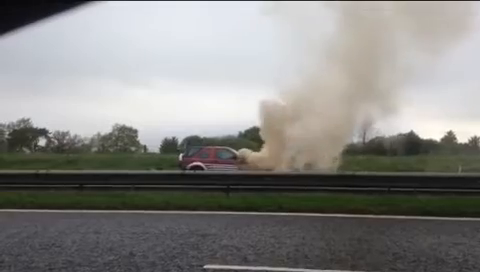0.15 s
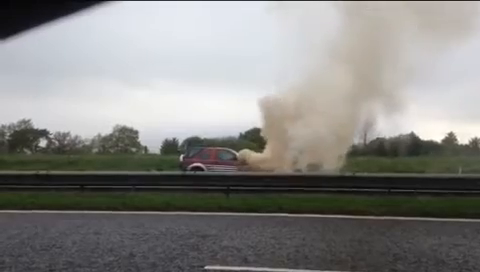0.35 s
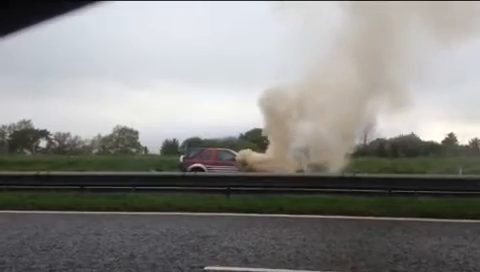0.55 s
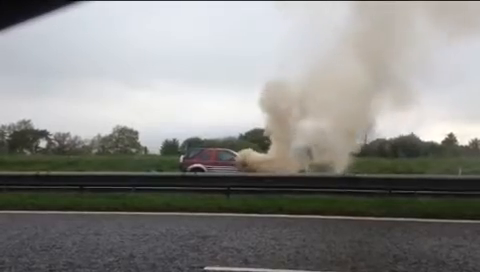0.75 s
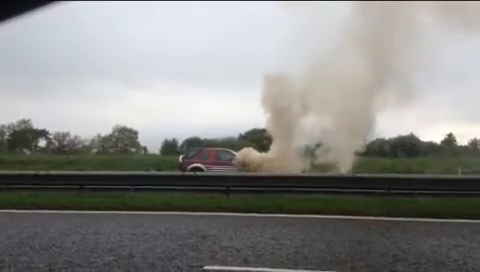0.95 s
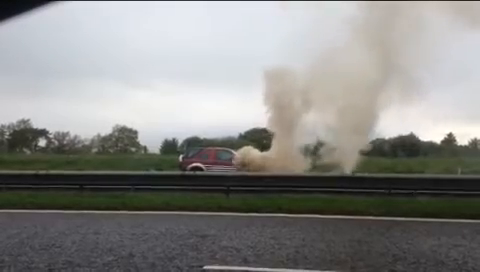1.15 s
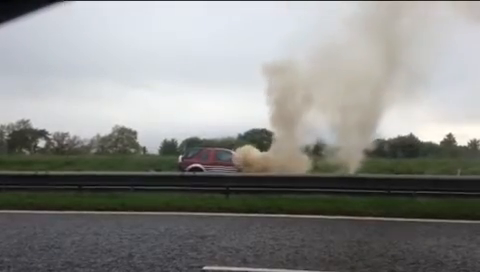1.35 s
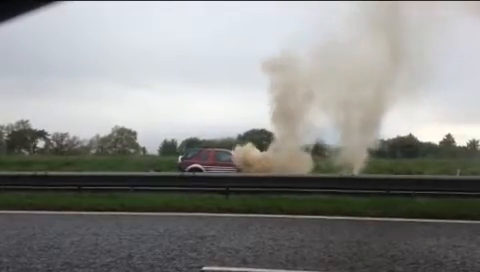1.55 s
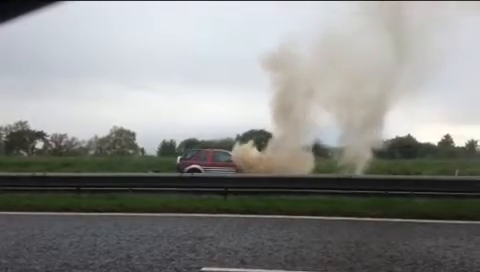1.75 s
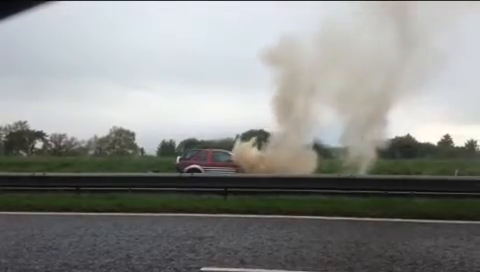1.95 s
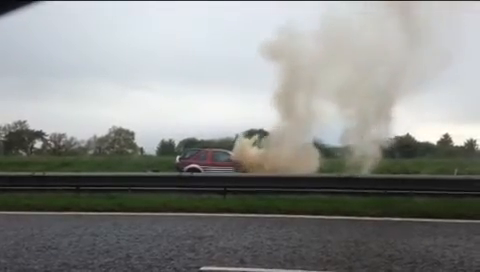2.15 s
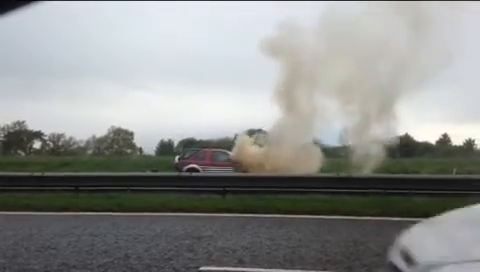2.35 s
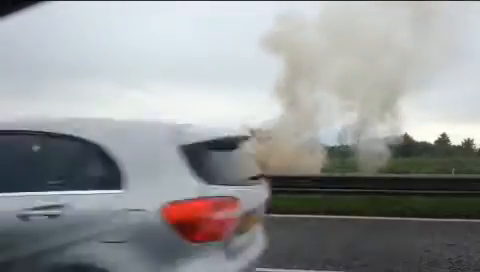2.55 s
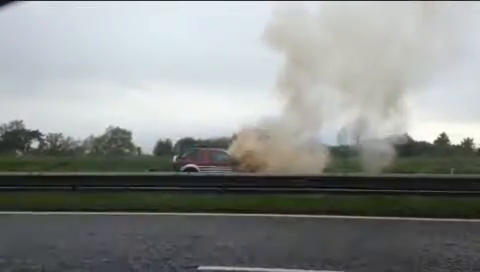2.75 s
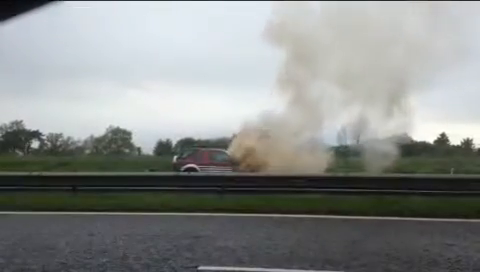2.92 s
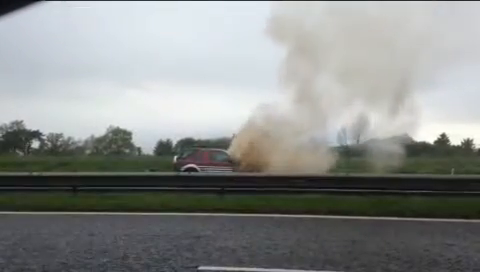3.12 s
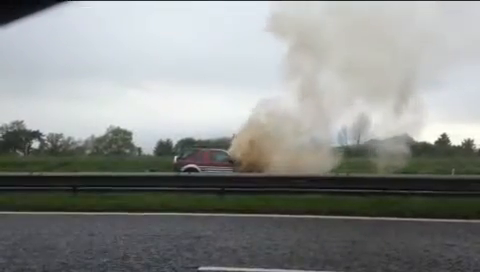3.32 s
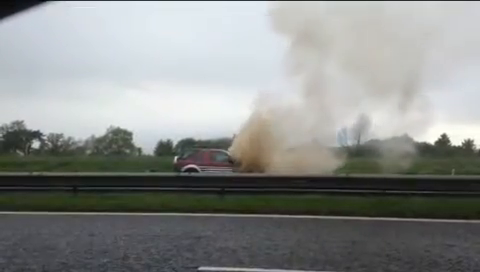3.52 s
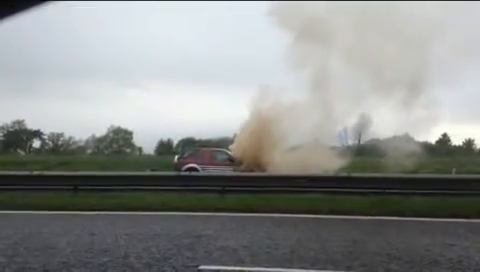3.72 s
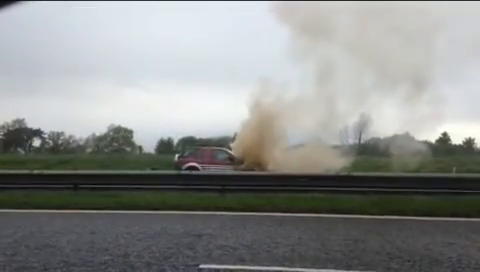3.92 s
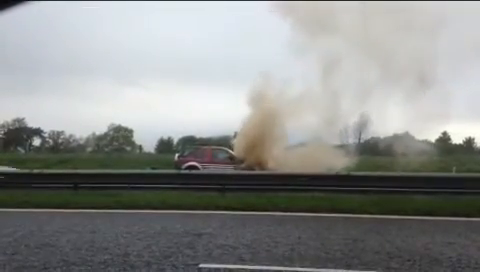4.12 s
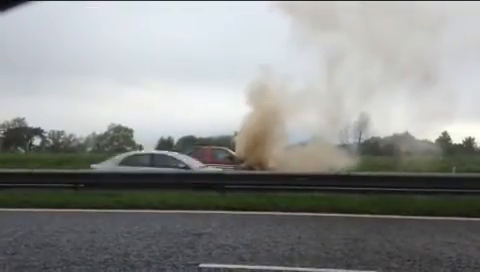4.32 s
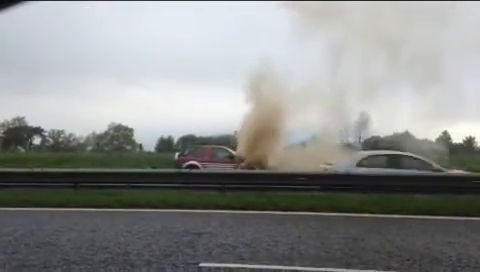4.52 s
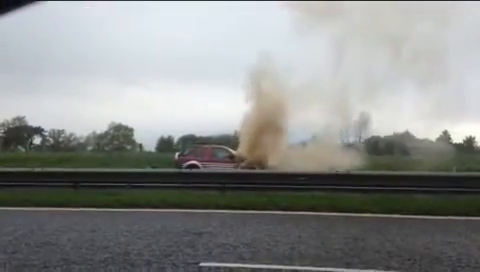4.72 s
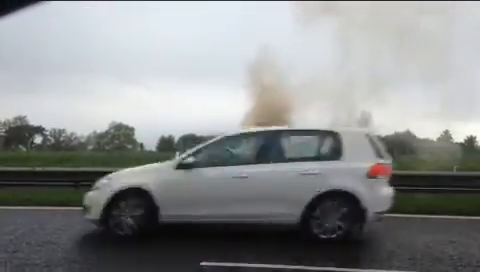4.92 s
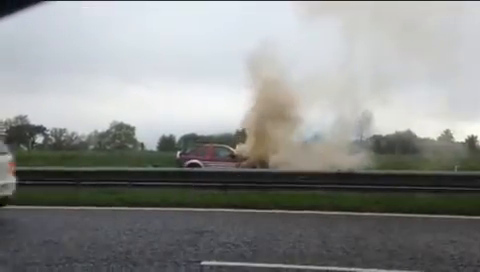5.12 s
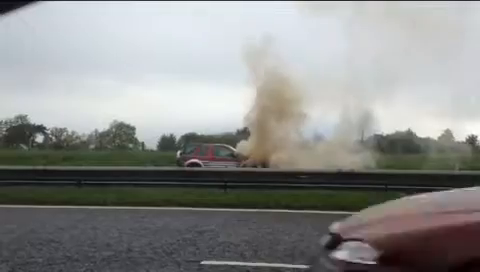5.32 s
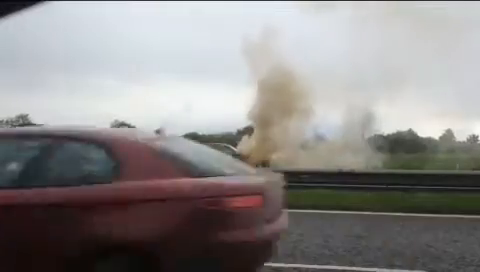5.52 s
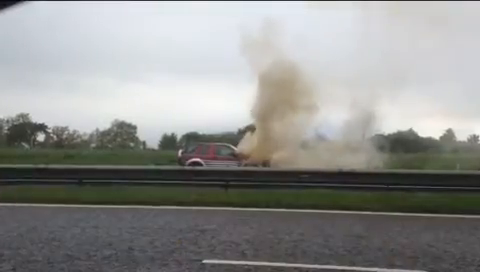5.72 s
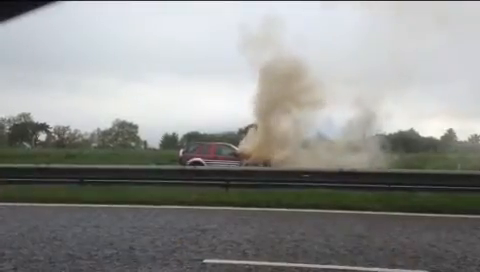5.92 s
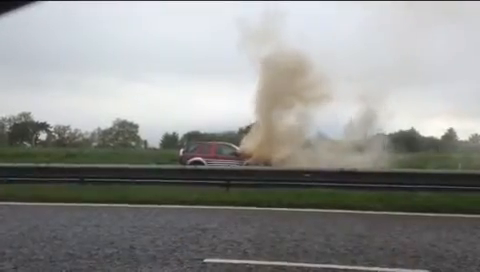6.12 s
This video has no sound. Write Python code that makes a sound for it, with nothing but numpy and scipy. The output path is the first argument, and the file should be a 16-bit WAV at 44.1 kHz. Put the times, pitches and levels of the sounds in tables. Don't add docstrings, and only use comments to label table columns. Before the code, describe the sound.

Steady distant motorway wash with a faint relay tick, then cars rush past close by with roaring tyres and hissing wet spray.

```python
import sys
import numpy as np
from scipy import signal
from scipy.fft import rfft, irfft, next_fast_len
from scipy.io import wavfile
from scipy.ndimage import map_coordinates

SR = 44100
rng = np.random.default_rng(int(sys.argv[2]) if len(sys.argv) > 2 else 0)


def to_linear_factor(level_db):
    exponent = np.asarray(level_db, float) / 20
    return 10 ** exponent


def store_pcm(level_fs):
    pcm = np.round(np.clip(level_fs, -1, 1) * 32767).astype(np.int16)
    wavfile.write(sys.argv[1], SR, np.atleast_2d(pcm).T)


N = 272097


def rms_one(x):
    return x / np.sqrt(np.mean(x ** 2) + 1e-20)


def drift(rate):
    r = np.exp(-80 * np.pi * rate / SR)
    noise = rng.standard_normal(N // 40 + 2002)
    slow = signal.lfilter([1], [1, -2 * r, r * r], noise)[2000:]
    return np.interp(np.arange(N) / 40, np.arange(len(slow)), rms_one(slow))


def ring(clicks, hz, t60):
    r = to_linear_factor(-60 / (t60 * SR))
    w = 2 * np.pi * hz / SR
    return signal.lfilter([0, np.sin(w)], [1, -2 * r * np.cos(w), r * r], clicks + 1e-18)


def rush(spectrum):
    size = next_fast_len(N + SR)
    hz = np.maximum(np.arange(size // 2 + 1) * SR / size, 1)
    points = np.array(spectrum)
    level_db = np.interp(np.log(hz), np.log(points[:, 0]), points[:, 1], left=-120, right=-120)
    return rms_one(irfft(rfft(rng.standard_normal(size)) * to_linear_factor(level_db), size))


# (time abeam [s], lane distance over speed [s], roar [dB],
# wetness [dB], heaviness [dB])
CARS_SEEN = [
    (2.511, 0.15, -11, 1.4, -1.5),
    (4.330, 0.19, -27.5, -19, 1),
    (4.930, 0.24, -17, 5.5, 1),
    (5.493, 0.21, -15, 3.5, -1.7),
]
CARS_UNSEEN_AHEAD = [(1.86, 0.32, -36, 5.5, -6), (1.96, 0.034, -29.5, -12, -5),
                     (2.13, 0.058, -29.5, -8, 4.5), (3.98, 0.33, -38.5, -14, 11),
                     (4.56, 0.1, -26.5, -12, 4.5)]
CARS_UNSEEN_BEHIND = [(2.85, 0.056, -43, 20, -3), (3.15, 0.26, -31.5, -7, 0), (3.4, .06, -42.5, 10, -3),
                      (3.58, 0.14, -37, -9, -5), (6.165, 0.26, -30.5, -12, 5)]
FAR_SHARES = np.array([0.59, 0.065, 0.47])
AXLE_OFFSET = 0.29
DOOR_POST, POST_SHARE = 1.4, 0.59
UNSEEN_DIRECT = 0.23


def passing(law, far_db, wet=0, trail=0, heavy=0, unseen_db=0):
    level_db, ahead_db, behind_db, window, fall = law
    t = np.arange(0, N + 100, 100) / SR
    sides = to_linear_factor(2 * far_db) * np.outer(FAR_SHARES / FAR_SHARES.sum(), np.ones_like(t))
    for cars, path in ((CARS_SEEN, None), (CARS_UNSEEN_AHEAD, 0), (CARS_UNSEEN_BEHIND, 2)):
        for s, reach_s, roar_db, wet_db, heavy_db in cars:
            along = (t - s) / reach_s - trail + AXLE_OFFSET * np.array([[-1], [1]])
            car_db = roar_db + level_db + wet * wet_db + heavy * heavy_db + unseen_db * (path == 0)
            power = to_linear_factor(2 * car_db) / (1 + along ** 2) ** fall
            seen = 1 / (1 + (along / window) ** 6)
            open_path = 1 / (1 + (np.maximum(along, 0) / DOOR_POST) ** 6)
            round_post = POST_SHARE * (1 - open_path)
            from_ahead = (1 - seen) * to_linear_factor(2 * ahead_db) * (along < 0)
            from_abeam = seen * (1 - round_post)
            from_behind = (1 - seen) * to_linear_factor(2 * behind_db) * (along > 0) + seen * round_post
            parts = (power * np.array([from_ahead, from_abeam, from_behind])).mean(axis=1)
            if path is None:
                sides = sides + parts
            else:
                sides[[path, 1]] += np.outer([1 - UNSEEN_DIRECT, UNSEEN_DIRECT], parts.sum(axis=0))
    return np.array([np.interp(np.arange(N) / SR, t, side) for side in sides])


# (level against its roar [dB], shade ahead [dB], shade behind [dB],
# window half-width [lane distances], fall with distance [power])
ROAR_LAW, FAR_ROAR_DB = (1.75, -5, -26.5, 2.65, 1.6956), -37.5
FAR_GLASS_MS, DOOR_FRAME_MS = (3.71, 2.986, 2.83), (1.604, 1.176, 1.59)
LAG_WANDER_MS = 0.1


def bearing():
    sides = passing(ROAR_LAW, FAR_ROAR_DB)
    shares = sides / sides.sum(axis=0)
    lags_ms = np.array([FAR_GLASS_MS, DOOR_FRAME_MS]) @ shares
    weave_ms = LAG_WANDER_MS * drift(1.45) * [[1], [0.3]]
    return shares, (lags_ms + weave_ms) * SR / 1000


def delayed(x, lag):
    return map_coordinates(x, [np.arange(N) - lag], order=3, mode="wrap")


# (time [s], pitch [ratio])
TREAD_PITCH = [(0, .98), (.9, 0.97), (1.6, 0.96), (2.0, 1.03), (2.2, 1), (2.45, 0.88), (2.7, 0.95),
               (3.4, 1.02), (3.7, 1.075), (4.2, 1.11), (4.5, 1.07), (4.8, 1.034), (5.1, 1.007),
               (5.4, 1.005), (5.62, 1.116), (5.76, 1.106), (6.17, 1.24)]
ECHO_STRENGTHS = [(-.5, -0.077), (-.1, -0.076), (-.08, -0.35)]


def from_three_sides(spectra):
    shares, lags = bearing()
    pitch_s, pitch_ratio = np.transpose(TREAD_PITCH)
    pitch = np.interp(np.arange(N) / SR, pitch_s, pitch_ratio)
    pitches = pitch, pitch, np.ones(N)
    out = np.zeros(N)
    for spectrum, share, ratio, strengths in zip(spectra, shares, pitches, ECHO_STRENGTHS):
        direct = map_coordinates(rush(spectrum), [np.cumsum(ratio)], order=3)
        echoes = sum(g * delayed(direct, lag) for g, lag in zip(strengths, lags))
        out += np.sqrt(share) * rms_one(direct + echoes)
    return out


def off_door_frame(x, strength):
    shares, lags = bearing()
    return x + strength * shares[2] * delayed(x, lags[1])


# (frequency [Hz], level [dB per Hz])
ROAR_NEARING = [(200, -76), (400, -13.5), (550, -10.5), (711, -12), (975, -2.5), (1250, -9), (1540, -7),
                (2000, -11.5), (2450, -23.5), (2700, -31), (3200, -30.5)]
ROAR_ABEAM = [(200, -20), (300, -10.5), (400, -8), (514, -5), (700, -3), (936, 5.5), (1300, -1.5),
              (1800, -4.5), (2290, -10.5), (2700, -17.5), (3300, -93), (4000, -55)]
ROAR_LEAVING = [(200, -28), (300, -20.5), (550, -17.5), (800, -6), (1050, 4), (1340, -17), (1650, 0),
                (2030, -25.5), (2300, -6.5), (2540, -10), (2600, -36), (2680, -45)]


def tyre_roar(texture):
    level = np.sqrt(passing(ROAR_LAW, FAR_ROAR_DB).sum(axis=0))
    return level * to_linear_factor(0.5 * texture) * from_three_sides([ROAR_NEARING, ROAR_ABEAM, ROAR_LEAVING])


# (frequency [Hz], level [dB per Hz])
RUMBLE = [(12, -50), (30, -14.5), (70, -9), (107, -6), (140, -2.5), (185, -2.5), (240, -4.5), (353, -6.5),
          (450, -13), (600, -18.5), (800, 0)]
RUMBLE_LAW, FAR_RUMBLE_DB = (-9, -4, -2, 1, 1.27), -45.5


def rumble(texture):
    level = np.sqrt(passing(RUMBLE_LAW, FAR_RUMBLE_DB, heavy=1).sum(axis=0))
    return level * to_linear_factor(0.1 * texture + 1.5 * drift(14)) * rush(RUMBLE)[:N]


# (frequency [Hz], level [dB per Hz])
SPRAY = [(2000, -25), (2600, 4), (2900, 2.5), (3300, 1.5), (4500, -4), (5500, -11), (7000, -27),
         (9000, -39), (15000, -50)]
SPRAY_ABEAM = [(2000, 1), (2600, 1.5), (3000, 4), (3600, 2), (4500, -2), (5500, -9), (7000, -16.5),
               (9000, -30), (15000, -50)]
SPRAY_LAW, FAR_SPRAY_DB = (-20.5, -6, -4, 1.1, 1.31), -65.5


def spray(texture, puddles):
    level = np.sqrt(passing(SPRAY_LAW, FAR_SPRAY_DB, wet=1, trail=0.083).sum(axis=0))
    return level * to_linear_factor(0.28 * texture + 1.4 * puddles) * from_three_sides([SPRAY, SPRAY_ABEAM, SPRAY])


# (frequency [Hz], level [dB per Hz])
FINE_SPRAY = [(4000, -25), (6000, 2), (8000, -0.5), (11000, -5.5), (14000, -8), (16000, -11)]
FINE_LAW, FAR_FINE_DB = (-29, -13, -6, 1.67, 2.08), -75


def fine_spray(puddles):
    sides = passing(FINE_LAW, FAR_FINE_DB, wet=0.4, trail=0.16, unseen_db=-3)
    hiss = off_door_frame(rush(FINE_SPRAY)[:N], strength=-0.45)
    return np.sqrt(sides.sum(axis=0)) * to_linear_factor(0.32 * puddles + 0.44 * drift(45)) * hiss


def traffic():
    texture, puddles = drift(19.5), drift(7.8)
    return tyre_roar(texture) + rumble(texture) + spray(texture, puddles) + fine_spray(puddles)


# (frequency [Hz], level [dB per Hz])
CABIN_BOOM = [(30, -30), (46, -4), (55, 4), (64, -7), (90, -15)]


def cabin_boom():
    return to_linear_factor(-56.5) * rush(CABIN_BOOM)[:N]


# (frequency [Hz], level [dB], t60 [s])
RELAY_MODES = [
    [(5400, -52, 0.028), (6400, -70, 0.018)],
    [(5900, -51, 0.027), (7500, -58, .02)],
]
RELAY_START_S, RELAY_PERIOD_S = 0.0905, 0.4003


def relay():
    out = np.zeros(N)
    for k, modes in enumerate(RELAY_MODES):
        times = np.arange(RELAY_START_S + k * RELAY_PERIOD_S, N / SR, 2 * RELAY_PERIOD_S)
        clicks = np.zeros(N)
        clicks[(times * SR).astype(int)] = 1
        for hz, level_db, t60 in modes:
            soft_landing = ring(clicks, hz, t60) - ring(clicks, hz, 0.3 * t60)
            out += to_linear_factor(level_db + 2) * soft_landing
    return out


# (time [s], length [s], frequency [Hz], level [dB])
DRONES = [(0.93, 0.67, 187, -51), (1.3, 0.22, 113, -48), (1.78, 0.16, 176, -42), (2.356, .12, 962, -14.5),
          (2.5, .25, 174, -37), (2.68, 0.16, 105, -35), (2.658, .14, 1400, -18.5), (2.767, .2, 411, -30.5),
          (2.765, 0.046, 1020, -17), (2.83, .03, 1100, -24), (2.878, .25, 203, -37), (4.05, .3, 188, -36.5),
          (4.801, 0.44, 78.7, -33), (4.916, 0.23, 563, -39), (4.972, .14, 2810, -28), (5.2, 0.28, 185, -35),
          (5.272, 0.064, 965, -24), (5.619, .14, 1532, -22), (5.598, 0.14, 230, -26.5),
          (5.871, 0.21, 107.4, -36.5)]


def drones():
    out, t = np.zeros(N), np.arange(N) / SR
    for s, length, hz, level_db in DRONES:
        near = np.abs(t - s) < 2 * length
        t60 = 24 / hz
        noise = rng.standard_normal(near.sum())
        tone = rms_one(ring(ring(noise, hz, t60), hz, t60))
        swell = np.exp(-2 * ((t[near] - s) / length * 2.06) ** 2)
        out[near] += to_linear_factor(level_db) * tone * swell
    return out


# (time [s], peak level [dB], frequency [Hz], t60 [s])
THUMPS = [(1.974, -28, 86.65, 0.14), (2.1, -24, 114, 0.075), (3.496, -36.5, 110.6, 0.34),
          (4.276, -30, 102, 0.54), (4.448, -31, 106, 0.09), (5.53, -14.5, 109.1, 0.084)]


def thumps():
    out = np.zeros(N)
    for s, peak_db, hz, t60 in THUMPS:
        click = np.zeros(N)
        click[round(s * SR)] = to_linear_factor(peak_db + 0.5)
        out += ring(click, hz, t60)
        out += 0.6 * ring(click, 0.95 * hz, 2.9 * t60)
        out -= 1.2 * ring(click, 1.01 * hz, 0.81 * t60)
    return signal.sosfilt(signal.butter(2, 260, fs=SR, output="sos"), out)


# (time [s], length [s], level [dB])
MIST = [(2.1, .08, -61), (2.46, .05, -43), (2.698, 0.046, -48), (2.853, 0.12, -53.5), (4.72, .05, -54),
        (4.82, 0.066, -51), (5.04, 0.064, -53), (5.3, .1, -48.5), (5.7, .1, -57)]


def mist():
    t = np.arange(N) / SR
    power = sum(to_linear_factor(2 * level_db) * np.exp(-2 * ((t - s) / length) ** 2) for s, length, level_db in MIST)
    return np.sqrt(power) * rush(FINE_SPRAY)[:N]


# (time [s], level [dB], t60 [s])
SPLASHES = [(2.39, -36, .3), (2.455, -35.5, 0.77), (2.68, -51, .3), (4.77, -35, .5), (4.965, -46, .3),
            (5.36, -37, 0.73), (5.48, -47, .4)]
# (frequency [Hz], level [dB per Hz])
SPLASH = [(2500, -30), (3500, -17), (4800, 11), (6200, 2), (9000, -6), (14000, -18), (16000, -24)]


def splashes():
    rise_s = 0.016
    t, burst = np.arange(N) / SR, np.zeros(N)
    for s, level_db, t60 in SPLASHES:
        age = np.maximum(t - s, 0)
        burst += to_linear_factor(level_db - 60 * age / t60) * np.clip(age / rise_s, 0, 1)
    return burst * rush(SPLASH)[:N]


def scene():
    steady = traffic() + cabin_boom() + relay()
    passing_events = drones() + thumps() + mist() + splashes()
    return (steady + passing_events)[None]


# (time [s], length [s], centre [Hz], width [Hz])
BAND_GAPS = [(.1, 0.15, 2650, 201), (0.315, 0.15, 2550, 118.6), (0.653, 0.092, 2550, 160),
             (1.222, 0.071, 2660, 160), (2.206, 0.11, 2937, 120), (2.372, 0.26, 2770, 120),
             (3.194, .1, 2660, 101.4), (3.335, 0.067, 2680, 219.7), (3.563, 0.11, 2760, 140),
             (4.219, 0.088, 2950, 138), (4.31, 0.13, 2945, 300), (4.39, 0.34, 2750, 242),
             (4.72, 0.097, 2973, 120), (5.128, 0.058, 2938, 121), (5.94, 0.13, 2680, 140.1)]


def thin_bands(x):
    out, t = x.copy(), np.arange(N) / SR
    for s, length, hz, width_hz in BAND_GAPS:
        near = np.abs(t - s) < length
        edges_hz = [hz - width_hz / 2, hz + width_hz / 2]
        band = signal.butter(2, edges_hz, "band", fs=SR, output="sos")
        gate = 0.92 * np.clip(2 - 4 * np.abs(t[near] - s) / length, 0, 1)
        out[:, near] -= gate * signal.sosfiltfilt(band, out[:, near])
    return out


def top_cut(x):
    return signal.sosfilt(signal.butter(12, 15320, fs=SR, output="sos"), x)


# (frequency [Hz], level [dB per Hz])
MIC_HISS = [(20, -8), (3000, -3), (8000, -6), (16000, -5)]


def record(dry):
    x = dry + to_linear_factor(-68) * rush(MIC_HISS)[:N]
    x = signal.sosfilt(signal.butter(1, 46, "high", fs=SR, output="sos"), x)
    x = x / (1 + np.abs(x / 0.99) ** 8) ** (1 / 8)
    return top_cut(thin_bands(x))


dry = scene()
out = record(dry)
store_pcm(out)
```